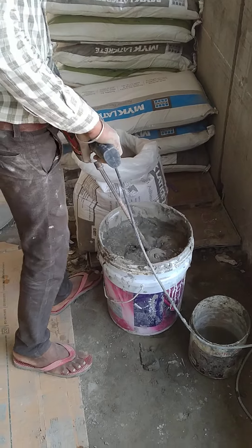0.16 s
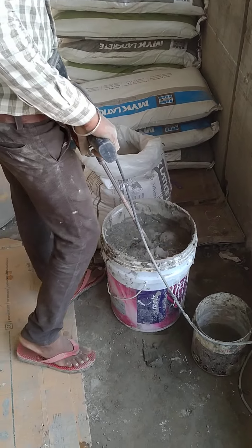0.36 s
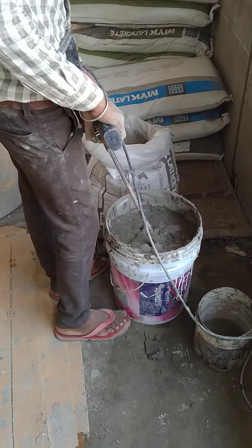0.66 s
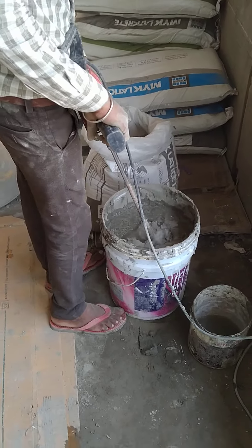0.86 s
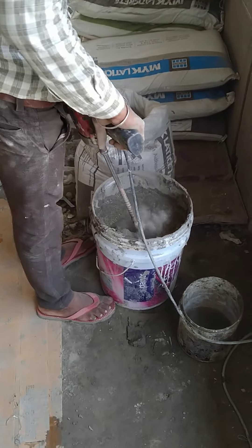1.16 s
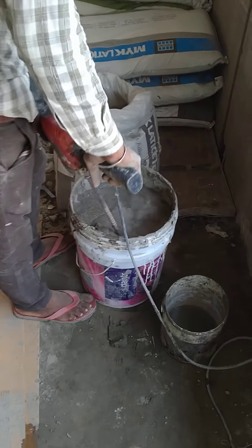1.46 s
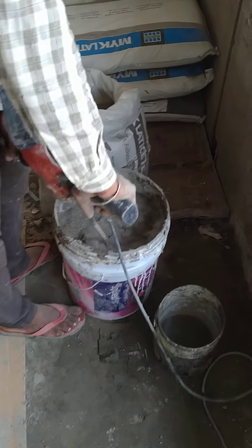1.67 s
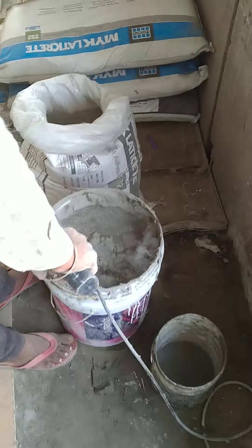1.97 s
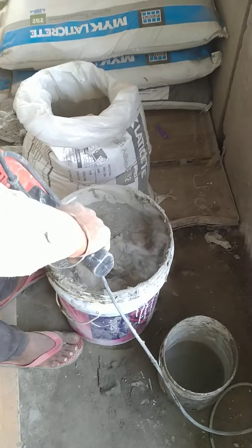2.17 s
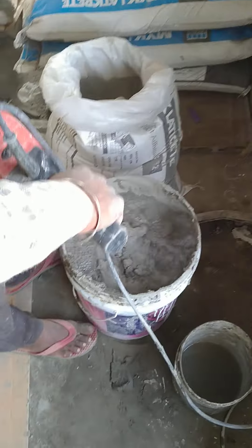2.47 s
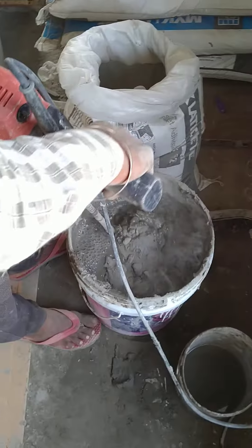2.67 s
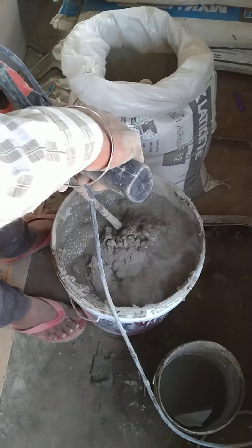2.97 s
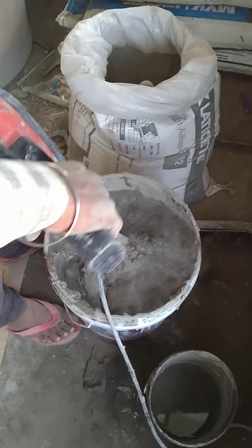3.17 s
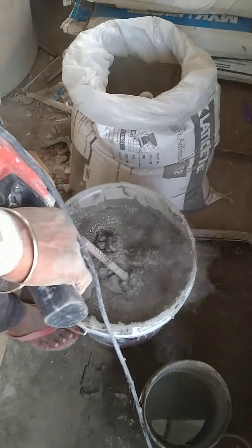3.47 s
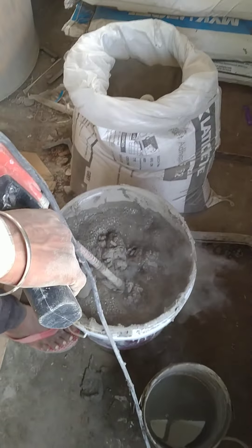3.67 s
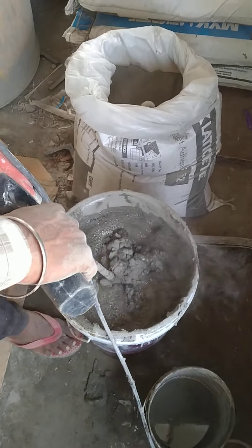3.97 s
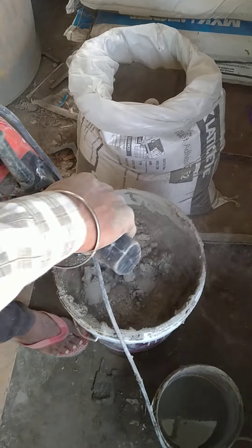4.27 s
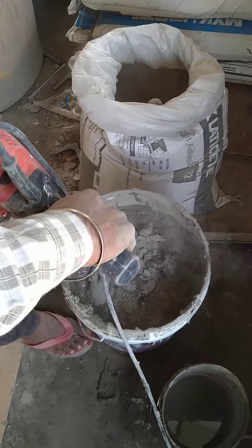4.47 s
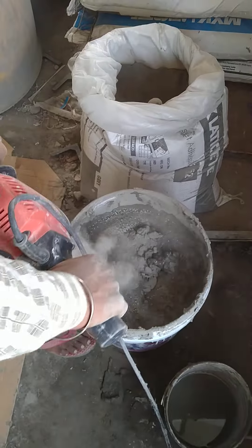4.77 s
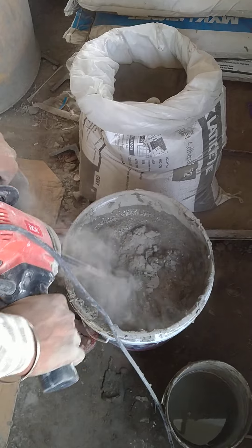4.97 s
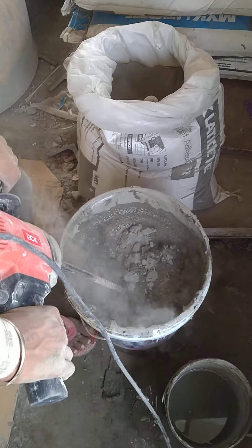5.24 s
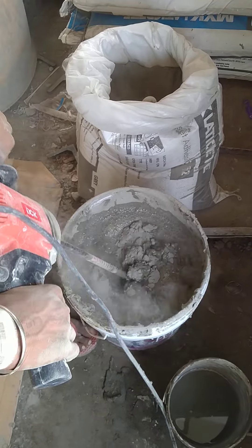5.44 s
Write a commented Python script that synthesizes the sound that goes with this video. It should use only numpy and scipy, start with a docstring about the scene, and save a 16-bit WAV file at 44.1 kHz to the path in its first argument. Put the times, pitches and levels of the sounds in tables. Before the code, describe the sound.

A handheld electric drill with a mixing paddle runs without pause for about 5.6 seconds, close to a single microphone in a small store room. A strong, piercing gear whine near 2.8 kHz, with its octave and a fluttering fan siren near 4.8 kHz, rides over rough rattle, brush hiss and rushing vent air. Pitch holds fairly steady for the first second, peaking slightly around 1.0, then slides about ten percent lower by 1.8. It climbs back by 3.3, holds until 4.0, then sags to its lowest around 5.1-5.3 and rises again at the end. The whine's strength shifts abruptly, dropping near 2.65 and returning at once, surging at 4.1 and 5.3. Gritty paste scraping and hollow bucket resonance are faint at first, fullest from about 2.6 to 4.6, then recede, while rattle swells late. Sound is mono, thin in bass, with dull top and short, shifting reflections.

```python
"""Small store room: an electric drill turns a mixing paddle through thick adhesive in a plastic bucket.
One motor speed, sagging as the paddle bites, sets every tone: two gear meshes, fan siren, rotor hum and overtones.
Shaped noise gives vent air, brush hiss and gearbox rattle.
Lumpy noise scrapes as paste and, with a buzz at twice the motor speed, rings the hollow of the bucket."""
import sys
import numpy as np
from scipy import signal
from scipy.fft import rfft, irfft, next_fast_len
from scipy.io import wavfile
from scipy.ndimage import map_coordinates

SR = 44100
rng = np.random.default_rng(int(sys.argv[2]) if len(sys.argv) > 2 else 0)


def put_to_file(sound):
    """Save the sound as 16-bit audio at rate SR, in the file named by the first command-line argument."""
    columns = np.atleast_2d(sound).T  # one column per channel
    safe = np.clip(columns, -1, 1)
    whole_steps = np.round(safe * 32767)
    wavfile.write(sys.argv[1], SR, whole_steps.astype(np.int16))


N = 247401
TIME_S = np.arange(N) / SR
PINION_TEETH, WHEEL_TEETH, SECOND_PINION_TEETH, FAN_BLADES = 7, 41, 7, 12
WHEEL_PER_TURN = PINION_TEETH / WHEEL_TEETH

# motor speed before flutter, sagging as the paddle bites: (time [s], speed [turns/s])
SPEED_HZ = [(0.0, 406.7), (0.36, 404.3), (0.96, 413.3), (1.18, 405.3), (1.49, 380.3), (1.78, 362.5),
            (1.9, 364.5), (2.12, 383.8), (2.41, 383.3), (2.88, 394.4), (3.11, 396.3), (3.35, 402.6),
            (3.62, 399.2), (4.06, 402.0), (4.43, 378.8), (4.71, 376.0), (4.83, 365.2), (5.14, 354.1),
            (5.3, 354.6), (5.49, 376.8), (5.61, 379.3)]
# level change of the gear whine and its octave, with some sudden jumps: (time [s], gain [dB])
WHINE_GAIN_DB = [(0, -3), (0.16, 4), (0.5, 2.5), (0.58, -4), (1.6, 1.5), (2.28, 3.5), (2.65, -7), (2.78, 4),
                 (3.3, -1.5), (4.08, -3.5), (4.12, 5), (4.32, 3.5), (4.51, -4.5), (5.03, -6), (5.31, -0.5),
                 (5.34, 7.5), (5.5, 0.0), (5.61, 5.5)]
# side tones of the out-of-round wheel: (offset from the first mesh [wheel turns], level re mesh tone [dB])
SIDE_TONES = [(-1, -28), (1, -16.5), (7, -28), (8, -29), (13, -27), (14, -26)]
# overtones of the second mesh: (multiple of its tooth rate, relative level [dB])
SECOND_TONES = [(2, -14), (3, -11), (4, 0), (5, -9), (9, -9)]
# housing modes that lift passing gear tones: (frequency [Hz], width [Hz], lift [dB])
HOUSING_MODES = [(1630, 66, 12), (1940, 36, 4.5), (2628.5, 264, 14.5), (5080, 85, 12)]
# fan siren beamed from the vents, before trim: (time [s], level [dB])
SIREN_DB = [(0.0, -30.0), (0.67, -30), (1.05, -26), (1.11, -27), (1.65, -24), (1.82, -30), (2.44, -22.5),
            (2.54, -25.5), (3.08, -17.0), (3.42, -23.5), (3.69, -35), (4.12, -22.5), (4.34, -27),
            (4.68, -20), (5.0, -33.0), (5.43, -22.0), (5.61, -23.5)]
# hum of rotor unbalance, before trim: (time [s], level [dB])
HUM_DB = [(0.03, -51.5), (0.7, -47.5), (2.41, -53), (2.6, -41.5), (3.71, -51.5), (3.83, -45), (5.3, -56)]
# rotor overtones, before fading: (multiple of motor speed, level [dB])
ROTOR_TONES = [(6, -47), (8, -44.5), (13, -53), (15, -46.5), (16, -45)]
# noise levels before trim: (time [s], churning paste [dB], gearbox rattle [dB], brush hiss [dB], vent air [dB])
EFFORT_DB = [(0.0, -37.0, -32, -29.5, -27.0), (0.46, -38.0, -31, -32.5, -29),
             (1.48, -40, -31.5, -29, -27.5), (1.84, -36.5, -33.0, -31, -26), (2.05, -34, -35, -30, -29.5),
             (2.41, -33, -35, -29, -28), (2.63, -31, -32, -26.5, -27.5), (3.28, -30, -31.5, -29.0, -26),
             (3.51, -29, -28, -26.5, -25.5), (4.61, -31, -30.5, -29.5, -29.0),
             (5.24, -34.5, -27.0, -27.5, -29), (5.61, -35, -33, -31, -31)]
# spectrum of the scraped paste: (frequency [Hz], relative density [dB/Hz])
PASTE_SPECTRUM = [(50, -24.5), (90, -14.5), (130, -15), (240, -5.5), (330, -2.5), (480, 1), (620, 1.5),
                  (900, 6), (1150, 1.5), (1600, -9), (3000, -43.5), (7000, -71.5)]
# modes of the bucket's hollow, before tuning: (frequency [Hz], width [Hz], relative drive [dB])
BUCKET_MODES = [(764, 98, 0.5), (925, 110, -6.5), (1337, 200, 0), (1720, 53, 0.5)]
# shift of those modes as paste heaps up and the drill covers the mouth: (time [s], frequency factor)
HOLLOW_TUNING = [(0, 0.96), (1.7, 1.54), (2.1, 1.1), (2.55, 1.004), (4.4, 1.0), (5.61, 1.13)]
# spectrum of the gearbox rattle: (frequency [Hz], relative density [dB/Hz])
RATTLE_SPECTRUM = [(100, -53.5), (400, -23), (800, -7), (1050, -2.5), (1250, -6), (1550, 0.5), (1850, 2.5),
                   (2150, -2), (2500, 2), (3300, -3), (6000, -34.5)]
# spectrum of the brush hiss: (frequency [Hz], relative density [dB/Hz])
BRUSH_SPECTRUM = [(100, -50), (900, -12.5), (2200, -11.5), (2750, 5), (3080, -5.5), (3400, 2.5), (3900, 5),
                  (4600, 1), (5400, -9), (6500, -26.5), (7500, -55.5)]
# spectrum of the vent air: (frequency [Hz], relative density [dB/Hz])
AIR_SPECTRUM = [(100, -63), (700, -22), (1500, -21), (2700, -14), (4000, -8), (4700, -3.5), (5150, 3),
                (5650, 2), (6100, -2), (6550, -8), (7000, -21), (7600, -38)]


def motor_turns(flutter=0.00064, flutter_hz=14):
    """Rotor angle in turns: integrated speed, fluttering (relative rms) with lumps in the paste."""
    speed_hz = curve(SPEED_HZ) * (1 + flutter * wander(flutter_hz))
    return np.cumsum(speed_hz) / SR


def gears(turns, first_mesh_db=-34.5, octave_db=-43, second_mesh_db=-42.5, fade_db=0.8, octave_fade_db=1.0,
          fade_hz=7):
    """Pinion teeth whine on the wheel; the wheel's shaft drives a slower second mesh."""
    whine_gain_db = curve(WHINE_GAIN_DB)

    side_rows = [(WHEEL_TEETH + offset, db) for offset, db in SIDE_TONES]
    first = tone(turns * PINION_TEETH, rough=0.13, rough_hz=30)
    first += overtones(turns * WHEEL_PER_TURN, side_rows)
    first_db = first_mesh_db + housing_lift_db(PINION_TEETH) + whine_gain_db + fade_db * wander(fade_hz)

    octave = tone(2 * turns * PINION_TEETH, rough=0.11, rough_hz=15)
    octave_level_db = octave_db + housing_lift_db(2 * PINION_TEETH) + whine_gain_db
    octave_level_db += octave_fade_db * wander(fade_hz)

    second_per_turn = SECOND_PINION_TEETH * WHEEL_PER_TURN
    second_rows = [(k, db + housing_lift_db(k * second_per_turn)) for k, db in SECOND_TONES]
    second = overtones(turns * second_per_turn, second_rows)
    second_db = second_mesh_db + swell_db(column=2)  # grows dB for dB with the rattle

    return gain_of(first_db) * first + gain_of(octave_level_db) * octave + gain_of(second_db) * second


def housing_lift_db(per_turn):
    """Housing resonances lift a gear tone as the speed carries this multiple through them."""
    hz = per_turn * curve(SPEED_HZ)
    return sum(lift_db / (1 + (2 * (hz - mode_hz) / width_hz) ** 2)
               for mode_hz, width_hz, lift_db in HOUSING_MODES)


def rotor(turns, room_db=-39, echo_max_db=-32, siren_trim_db=-0.23, hum_trim_db=-3.0,
          flicker_db=0.1, flicker_hz=10):
    """Fan blades chop the air into a siren over unbalance hum and armature overtones."""
    blades = turns * FAN_BLADES
    # turned away, the siren is heard mostly by beating echoes
    whole = gain_of(curve(SIREN_DB) + siren_trim_db + flicker_db * wander(flicker_hz))
    echo = np.minimum(whole, gain_of(echo_max_db))
    direct = np.sqrt(whole ** 2 - echo ** 2)
    siren = direct * tone(blades, rough=0.11, rough_hz=35)
    siren += echo * diffuse(blades, width_hz=7.3)
    siren += gain_of(room_db) * diffuse(blades, width_hz=62)
    hum = gain_of(curve(HUM_DB) + hum_trim_db) * tone(turns, rough=0.18, rough_hz=10.0)
    return siren + hum + overtones(turns, ROTOR_TONES, fade_db=2.0)


def wobble(turns, depth=0.065, throbs_per_turn=0.256):
    """Gain of a slight throb on the gear and rotor tones, about once in four rotor turns."""
    return 1 + depth * tone(throbs_per_turn * turns, rough=0.18, rough_hz=8)


def churn(turns, lump_db=0.57, scrape_db=-38.5, hollow_db=-37.5, buzz_db=-12, scrape_rise=0.21,
          hollow_rise=1.84):
    """Paddle scrapes gritty lumps; scraping and motor buzz ring the bucket's hollow (rises in dB per dB)."""
    stir_db = swell_db(column=1)
    lumps = gain_of(lump_db * wander(25))
    surface = colour(lumps * rng.standard_normal(N), PASTE_SPECTRUM)
    wall = colour(lumps * rng.standard_normal(N), PASTE_SPECTRUM)

    # an open bucket radiates little bass: the slope of the wall scraping drives it
    drive = np.gradient(wall)
    tuning = curve(HOLLOW_TUNING)
    ring = sum(gain_of(db) * resonate(drive, hz * tuning, width_hz) for hz, width_hz, db in BUCKET_MODES)

    # twice the motor speed meets the lowest mode
    lowest_hz, lowest_width_hz, _ = BUCKET_MODES[0]
    buzz = resonate(tone(2 * turns, rough=0.99, rough_hz=25), lowest_hz * tuning, lowest_width_hz)
    hollow = evened(ring) + gain_of(buzz_db) * evened(buzz)

    # the hollow stands out more as churning grows louder
    scrape_gain = gain_of(scrape_db + scrape_rise * stir_db)
    hollow_gain = gain_of(hollow_db + hollow_rise * stir_db)
    return scrape_gain * surface + hollow_gain * hollow


def rattle(turns, throb=0.13, trim_db=1.72):
    """Teeth and bearings shake the housing, slightly harder once per wheel turn."""
    beat = 1 + throb * np.cos(2 * np.pi * turns * WHEEL_PER_TURN)
    shaken = colour(beat * rng.standard_normal(N), RATTLE_SPECTRUM)
    return gain_of(curve(EFFORT_DB, column=2) + trim_db) * shaken


def vents(brush_trim_db=1.0, air_trim_db=2.0):
    """Turbulent air and brush hiss leave through the housing slots."""
    brushes = colour(rng.standard_normal(N), BRUSH_SPECTRUM)
    air = colour(rng.standard_normal(N), AIR_SPECTRUM)
    brush_gain = gain_of(curve(EFFORT_DB, column=3) + brush_trim_db)
    air_gain = gain_of(curve(EFFORT_DB, column=4) + air_trim_db)
    return brush_gain * brushes + air_gain * air


def reflections(x, echo=0.18, sway_s=0.00018):
    """Floor, body and walls echo along paths that shift as the drill sways: a slowly moving comb."""
    paths_s = np.geomspace(0.0016, 0.014, 6)
    echoes = 0
    for path_s in paths_s:
        read_s = TIME_S - path_s - sway_s * wander(0.43)
        echoes = echoes + map_coordinates(x, [read_s * SR], order=1)
    return (x + echo * echoes) / np.sqrt(1 + len(paths_s) * echo ** 2)


def diffuse(turns, width_hz):
    """A tone as the room returns it: many beating paths make it flutter around its pitch."""
    angle = 2 * np.pi * turns
    return wander(width_hz) * np.cos(angle) + wander(width_hz) * np.sin(angle)


def overtones(turns, rows, fade_db=0, fade_hz=4.7, rough=0.12, rough_hz=14):
    """Tones on multiples of a rotation; with fade_db each swells and fades at random by itself."""
    return sum(gain_of(db + fade_db * wander(fade_hz)) * tone(k * turns, rough, rough_hz) for k, db in rows)


def tone(turns, rough, rough_hz):
    """Sine, rms 1 before roughness makes its height and phase tremble."""
    angle = 2 * np.pi * (turns + rng.random())
    in_phase = (1 + rough * wander(rough_hz)) * np.cos(angle)
    quadrature = rough * wander(rough_hz) * np.sin(angle)
    return np.sqrt(2) * (in_phase + quadrature)


def resonate(x, hz, width_hz):
    """Resonance following the curve hz: shift down to zero, smooth, shift back."""
    carrier = np.exp(2j * np.pi * np.cumsum(hz) / SR)
    r = np.exp(-np.pi * width_hz / SR)
    smooth = signal.lfilter([1 - r], [1, -r], x / carrier)
    return 2 * (carrier * smooth).real


def colour(x, points):
    """Filters x by a spectrum, to rms 1."""
    hz, db = np.transpose(points)
    size = next_fast_len(N)
    f_hz = np.fft.rfftfreq(size, 1 / SR)
    shape = gain_of(np.interp(np.log(f_hz + 1), np.log(hz), db))
    return evened(irfft(rfft(x, size) * shape, size)[:N])


def wander(rate_hz):
    """Smooth random curve, rms about 1, moving up to about rate_hz."""
    size, step = 8192, 64  # coarse points, samples between them
    f_hz = np.fft.rfftfreq(size, step / SR)
    spectrum = rfft(rng.standard_normal(size)) / np.sqrt(1 + (f_hz / rate_hz) ** 4)
    return np.interp(np.arange(N) / step, np.arange(size), evened(irfft(spectrum)))


def swell_db(column):
    """One effort column, in dB about its mean."""
    level_db = curve(EFFORT_DB, column)
    return level_db - level_db.mean()


def curve(rows, column=1):
    """One table column, joined by straight lines in time."""
    rows = np.asarray(rows)
    return np.interp(TIME_S, rows[:, 0], rows[:, column])


def evened(x):
    """Scales to rms 1."""
    return x / np.sqrt(np.mean(x ** 2) + 1e-20)


def gain_of(db):
    """Amplitude factor of a level in dB."""
    return 10 ** (np.asarray(db) / 20)


def scene():
    """Drill and bucket heard from one spot: the same signal in both channels."""
    turns = motor_turns()
    whine = (gears(turns) + rotor(turns)) * wobble(turns)
    mono = whine + churn(turns) + reflections(rattle(turns) + vents())
    return np.array([mono, mono])


def record(dry, bass_cut_hz=120, edge_hz=7700):
    """Single microphone: steep bass cut, then a narrow band limit."""
    bass_cut = signal.butter(4, bass_cut_hz, "highpass", fs=SR, output="sos")
    thin = signal.sosfilt(bass_cut, dry)
    band_limit = signal.firwin(511, edge_hz, window=("kaiser", 9), fs=SR)
    return signal.oaconvolve(thin, band_limit[None], "same", axes=1)


dry = scene()
out = record(dry)
put_to_file(out)
```